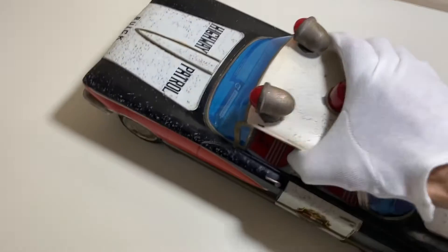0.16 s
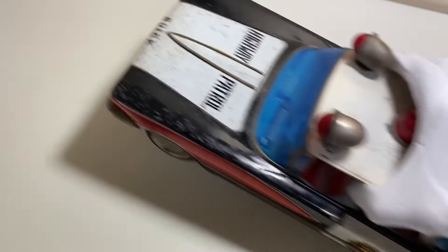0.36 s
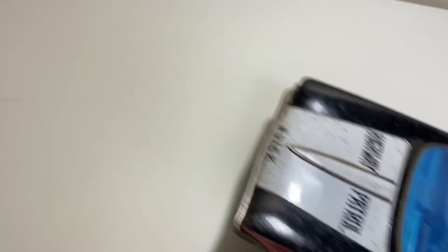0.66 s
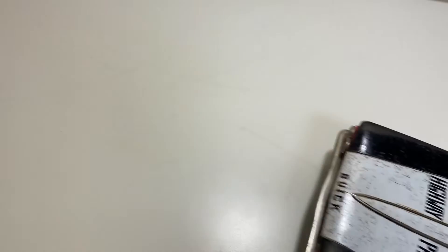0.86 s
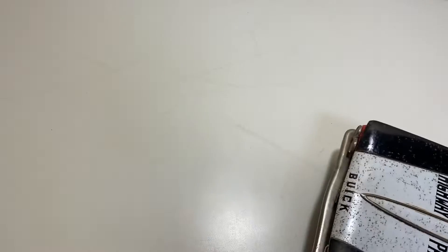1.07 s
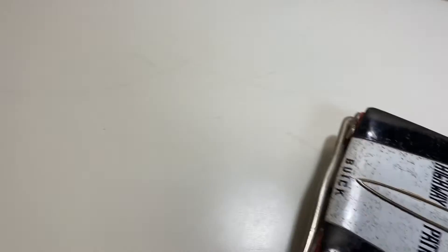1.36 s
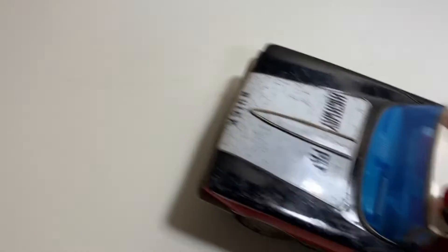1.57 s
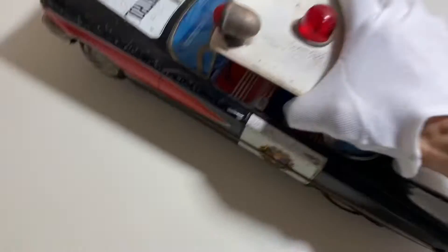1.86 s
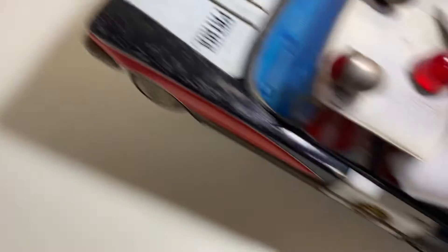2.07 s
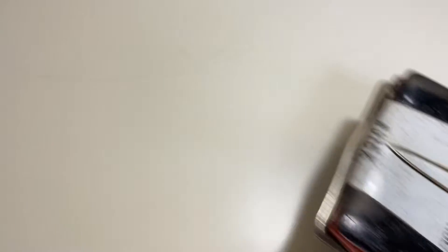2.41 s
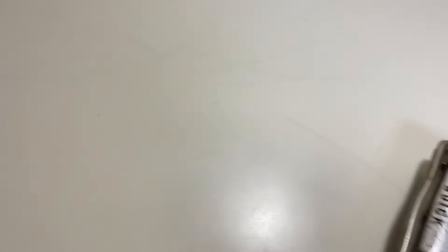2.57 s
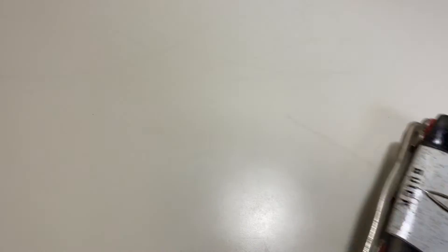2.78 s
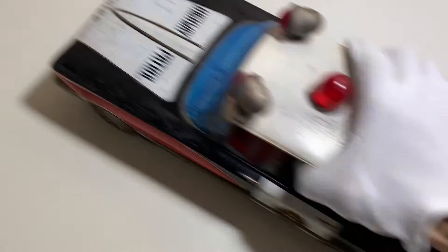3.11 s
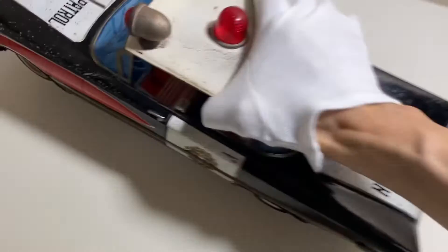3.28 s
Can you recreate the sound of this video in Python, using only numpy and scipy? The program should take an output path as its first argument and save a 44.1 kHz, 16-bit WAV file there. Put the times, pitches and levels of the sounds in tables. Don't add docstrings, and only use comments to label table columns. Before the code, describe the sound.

A tin toy car whirrs very faintly at first, then hits a table with hard, ringing clacks at 0.8 s. Its roll slows with small knocks until 1.4 s. A push from 1.5 s brings gritty rumble and rising gear rattle; lifted at 1.9 s, it whirrs freely. It smacks down at 2.57 s, rolls with knocks until 3.2 s, then whirrs brightly to the end. Close, small room.

```python
import sys
import numpy as np
from scipy import signal
from scipy.fft import rfft, irfft, next_fast_len
from scipy.io import wavfile
from scipy.ndimage import uniform_filter1d, map_coordinates

SR = 44100
rng = np.random.default_rng(int(sys.argv[2]) if len(sys.argv) > 2 else 0)


def boost(x):
    u = np.asarray(x, float) / 20
    return 10 ** u


def store_pcm(level_fs):
    pcm = np.round(np.clip(level_fs, -1, 1) * 32767).astype(np.int16)
    wavfile.write(sys.argv[1], SR, np.atleast_2d(pcm).T)


N = 152145
TOP_HZ = 15750
TONE_SWELL_DB = 1.8

# centre_hz, width_hz, level_db
SHELL = [(401.5, 33, 1), (498.6, 12.7, 3.5), (643, 101, -1.5), (816, 31, -2.5), (888, 68, -6),
         (1055, 55, -5), (1450, 190, -13.5), (1605, 30, -5.5), (1963, 30, -37)]
# centre_hz, width_hz, level_db
PANELS = [(2520, 40, 6), (3157, 16, -3.5), (4280, 380, -2), (4920, 15, 6.5), (5480, 8.5, 9), (6046, 41, 1),
          (6950, 180, -0.5), (7500, 22, 9), (8150, 440, 3.5), (10560, 710, -13), (15130, 1100, 5)]
# centre_hz, width_hz, level_db
TABLE = [(56, 5.3, 3), (105, 12, 0.5), (162, 54, -6), (224.3, 13.7, -0.5), (299.4, 31, 1),
         (418.4, 45.4, 4.5), (503.3, 41, 5.5), (638, 112, 6.5), (798, 152, 0.5), (1073, 117, 1),
         (1254, 51, 1), (1519, 129, 2)]
# freq_hz, density_db
FIZZ = [(300, -24.5), (1500, 5), (2500, 0), (4000, 0.5), (8000, 1.5), (12000, 2.5), (15600, -4.5),
        (16000, -56)]
# freq_hz, density_db
GRIT = [(40, -52), (300, -9), (800, -6), (1800, -10.5), (3000, -20), (6000, -36), (16000, -77)]


def unit(x):
    return x / np.sqrt(np.mean(x ** 2) + 1e-20)


def along(points, hz):
    f, v = np.transpose(points)
    return np.interp(np.log(hz + 1), np.log(f + 1), v)


def curves(rows):
    s, *cols = np.transpose(rows)
    return [np.interp(np.arange(N) / SR, s, c) for c in cols]


def wobble(rate):
    return map_coordinates(rng.standard_normal(N // 100), [np.arange(N) * rate / SR])


def filtered(x, response):
    m = next_fast_len(x.shape[-1] + SR // 2)
    spectrum = rfft(x, m) * response(np.fft.rfftfreq(m, 1 / SR))
    return irfft(spectrum, m)[..., :x.shape[-1]]


def below_top(f):
    return f < TOP_HZ


def colour(points):
    return lambda f: boost(along(points, f))


def body(peaks, low=0, high=1e9):
    def response(f):
        total = 0
        for k, (centre, width, db) in enumerate(peaks):
            if low <= centre < high:
                damping = 1j * f * width
                total = total + (-1) ** k * boost(db) * damping / (centre * centre - f * f + damping)
        return total
    return response


def blows(where, scatter_db):
    size_db = scatter_db * np.minimum(rng.exponential(1, N), 2.6)
    return unit(where * boost(size_db) * rng.standard_normal(N))


def handled(x, peaks):
    return sum(boost(2.5 * wobble(5.5)) * filtered(x, body([peak])) for peak in peaks)


def patchy(x):
    z = signal.stft(x, nperseg=512)[2]
    field = uniform_filter1d(rng.standard_normal(z.shape), size=5, axis=0)
    field = uniform_filter1d(field, size=16, axis=1)
    return signal.istft(z * boost(1.9 * unit(field)), nperseg=512)[1][:N]


def gears():
    # time_s, whirr_db, shell_share_db
    spin = [(0, -46.5, -16), (.2, -45, 2.5), (.45, -51.5, 4.5), (.78, -48, 13.5), (1.01, -62, 15),
            (1.14, -63, 14), (1.34, -65, 1), (1.5, -46.5, 4), (1.68, -33, 4), (1.92, -29, -5),
            (2.25, -35.5, -1), (2.55, -37, 5), (2.75, -35.5, -0.5), (3.1, -31.5, 11), (3.3, -27.5, -4),
            (3.45, -28.5, -11)]
    # time_s, rate_hz, tone_db
    mesh = [(0, 700, -73), (.25, 707, -65), (.75, 690, -51), (.85, 560, -73), (1.3, 309, -48),
            (1.82, 710, -38), (1.93, 680, -44), (2.55, 652, -46.5), (2.62, 600, -75), (3.2, 670, -37),
            (3.3, 665, -47), (3.45, 710, -44)]
    whirr_db, shell_db = curves(spin)
    rate, tone_db = curves(mesh)
    turn = np.cumsum(rate * (1 + .007 * wobble(30))) / SR
    jitter = .25 * wobble(400)
    teeth = np.diff(np.floor(turn + jitter), prepend=0) != 0
    scrape = rng.standard_normal(N) * (1 + 0.19 * np.cos(np.pi * turn))
    strikes = 0.5 * blows(teeth, 4.5) + 1.16 * scrape

    clicks = patchy(1.2 * strikes + handled(strikes, PANELS))
    fizz = unit(filtered(clicks, lambda f: colour(FIZZ)(f) * below_top(f)))
    buzz = unit(filtered(handled(strikes, SHELL), lambda f: 1 / (1 + (320 / (f + 1)) ** 7.5)))
    tone = boost(TONE_SWELL_DB * wobble(24.3)) * np.sin(2 * np.pi * turn)
    octave = boost(6.0 + TONE_SWELL_DB * wobble(23.35)) * np.sin(4 * np.pi * turn)

    eccentric_db = .5 * wobble(7.7) + 0.22 * wobble(34.06)
    rattle = boost(4.0) * fizz + boost(shell_db + 3.2 * wobble(17)) * buzz
    whirr = boost(whirr_db + eccentric_db) * rattle
    return whirr + boost(tone_db) * (tone + octave) + filtered(singing(strikes), below_top)


def wheels():
    # time_s, rolling_db
    push = [(0, -33.5), (.12, -40), (.24, -43.5), (.3, -75), (.78, -72), (.83, -29), (1.05, -38),
            (1.14, -49.5), (1.34, -40), (1.5, -28.5), (1.65, -24), (1.84, -24.5), (1.9, -58), (2.55, -58),
            (2.6, -26), (2.79, -33), (2.92, -24.5), (3.11, -20.5), (3.2, -25), (3.25, -45)]
    roll_db, = curves(push)
    bumps_per_s = 1400
    grit = blows(rng.random(N) < bumps_per_s / SR, 2.2) + 0.94 * rng.standard_normal(N)
    upper = unit(filtered(grit, lambda f: (body(TABLE, 260)(f) + 0.97 * colour(GRIT)(f)) * below_top(f)))
    thud = unit(filtered(grit, body(TABLE, 0, 140)))
    rumble = unit(filtered(grit, body(TABLE, 140, 260)))
    fall_db = 110 * np.arange(N) / SR
    sway_db = np.maximum.accumulate(roll_db + fall_db) - fall_db
    rolling = boost(roll_db + 0.86 * wobble(45)) * (upper + boost(-10.5) * rumble)
    return rolling + boost(sway_db + 1.8 * wobble(17) - 10.5) * thud


def room_floor():
    # freq_hz, density_db
    hum = [(25, -7.5), (60, -0.5), (250, -4.5), (600, 1), (1500, 3), (4000, -21), (15600, -75),
           (16000, -60)]
    noise = rng.standard_normal(N)
    return boost(-50) * unit(filtered(noise, lambda f: colour(hum)(f) * below_top(f)))


def singing(strikes):
    # start_s, end_s, pitch_hz, end_pitch_hz, level_db
    free = [(.01, 0.718, 1442, 1395, -47), (.01, 0.658, 4640, 4330, -52.5), (0.217, 0.747, 6980, 6750, -53),
            (0.096, 0.313, 6320, 5900, -53), (1.816, 2.117, 4280, 4160, -44),
            (1.95, 2.297, 5600, 5530, -41), (2.33, 2.565, 655, 635, -33), (2.903, 3.183, 7500, 7500, -38),
            (3.239, 3.504, 1057, 1046, -35.5), (3.246, 3.5, 5740, 5720, -37.5),
            (2.1, 2.171, 667, 660, -37.5), (2.188, 2.246, 670, 665, -35.5), (1.937, 2.037, 1370, 1335, -44),
            (1.84, 1.947, 1003, 996, -37.5), (1.441, 1.476, 697, 680, -31), (1.506, 1.538, 690, 660, -30),
            (1.566, 1.609, 444, 432, -25.5), (1.58, 1.629, 855, 892, -28.5),
            (1.612, 1.665, 1686, 1720, -31), (1.636, 1.66, 2520, 2450, -31), (1.64, 1.722, 500, 467, -28),
            (1.738, 1.81, 500, 506, -31), (1.796, 1.834, 853, 883, -30), (1.806, 1.878, 1458, 1380, -25),
            (2.651, 2.706, 349, 397, -29), (2.804, 2.88, 672, 718, -30.5), (2.927, 3.007, 422, 396, -29.5),
            (3.019, 3.081, 1650, 1700, -25.5), (3.026, 3.086, 790, 790, -31), (3.036, 3.149, 424, 440, -30),
            (3.11, 3.137, 624, 610, -29), (3.121, 3.205, 1535, 1590, -31.5)]
    width_hz = 75
    out = np.zeros(N)
    for a, b, hz, end_hz, db in free:
        start = round(a * SR)
        piece = strikes[start:round(b * SR)]
        u = np.arange(len(piece)) / SR / (b - a)
        narrow = filtered(piece, lambda f: body([(hz, width_hz, 0)])(f) ** 2)
        band = signal.hilbert(unit(narrow))
        drift = np.exp(1j * np.pi * (end_hz - hz) * (b - a) * u ** 2)
        swell = np.sqrt(np.abs(np.sin(np.pi * u)))
        out[start:][:len(piece)] += boost(db) * swell * np.real(band * drift)
    return out * boost(TONE_SWELL_DB * wobble(26))


def knocks():
    # time_s, peak_db, thud_db, clank_db, length_factor
    contacts = [(0.162, -16.5, -23, -28, 1.09), (0.618, -37, -25, -25, 0.66), (0.795, -9, -11, -42, 0.4),
                (0.801, -9.5, -13, -21.5, 0.71), (0.815, -14, -4, -31, 0.84), (0.83, -25, -18, -13.5, 0.79),
                (0.903, -15.5, -13, -33.5, 0.88), (0.987, -23.5, -14, -29, 0.42),
                (1.024, -28, -15, -42, 1.1), (1.157, -19, -15, -42, 1.12), (1.2, -38, -2, -42, 1),
                (1.219, -31, -25, -12.5, 0.38), (1.225, -17.5, -16, -37, 0.93),
                (1.261, -15, -13.5, -23.5, 1), (1.4, -49, -20, -30, 0.48), (1.432, -23, -5, -38, 0.94),
                (1.514, -26, -17, -30, 0.55), (1.629, -16.5, -20, -37, 0.74), (1.666, -13, -20, -32, 0.7),
                (1.749, -8, -24, -23.5, 0.78), (2.12, -19.5, -33, -19, 0.5), (2.209, -25, -25, -15, 0.71),
                (2.28, -34, -22, -6, 0.85), (2.395, -29, -24, -20, 1), (2.567, -5, -7.5, -19, 0.76),
                (2.66, -22, -9, -24, 0.84), (2.809, -13, -16, -20.5, 0.63), (2.869, -20.5, -18, -32, 1.2),
                (3.031, -19, -23, -38, 0.84), (3.119, -8.5, -18, -19, 0.54), (3.304, -26, -39, -2, 0.68)]
    # freq_hz, t60_s
    decay = [(100, 0.034), (400, 0.24), (1200, 0.12), (3000, 0.2), (8000, 0.1), (15000, 0.099)]
    # centre_hz, width_hz, level_db
    thump = [(104.6, 10.6, 5), (172, 81, -4), (261.6, 40, 3)]
    clack_rise_s, clank_rise_s, shove_s = 0.0018, 0.0033, 0.0014
    touch_s = .002
    out, size = np.zeros((3, N + SR)), SR // 4
    t = np.arange(size) / SR
    for s, db, thud_db, clank_db, longer in contacts:
        hz, tt, z = signal.stft(rng.standard_normal(size), SR, nperseg=128)
        t60 = longer * along(decay, hz)
        tail = signal.istft(z * boost(-60 * tt / t60[:, None]), SR, nperseg=128)[1][:size]
        snap = tail * (1 - np.exp(-t / clack_rise_s))
        tick = tail * (1 - np.exp(-t / clank_rise_s)) * (1 + 0.37 * boost(-60 * t / 0.0054))
        shove = 0.44 * tail + (1 - t / shove_s) * np.exp(-t / shove_s)
        levels = boost(db + np.array([[thud_db], [0], [clank_db]]))
        out[:, round((s - touch_s) * SR):][:, :size] += levels * np.array([shove, snap, tick])

    def clack_path(f):
        return body(TABLE, 260)(f) + .5 * body(SHELL)(f) + 0.69 * colour(GRIT)(f)

    thud = boost(15.5) * filtered(out[0], body(thump))
    clack = boost(6.5) * filtered(out[1], clack_path)
    clank = boost(3) * filtered(out[2], lambda f: colour(FIZZ)(f) * (2.58 + body(PANELS)(f)))
    return (thud + clack + clank)[:N]


def rings():
    # start_s, pitch_hz, settled_pitch_hz, level_db, t60_s
    plates = [(.795, 171, 490, -13.5, .24), (.82, 1025, 1086, -15.5, .12), (.903, 645, 634, -13, 0.046),
              (1.156, 660, 614, -23, .04), (1.222, 2482, 2470, -30, 0.082), (1.224, 1610, 1620, -35, 0.061),
              (1.262, 710, 674, -22, .08), (1.259, 15200, 14650, -34, .05), (1.433, 665, 665, -18, .05),
              (2.569, 544, 567, -16.5, 0.17), (2.569, 1510, 1460, -15, .06), (2.572, 794, 790, -28, .15),
              (2.809, 680, 670, -20, .05), (2.568, 2540, 2560, -20, 0.08)]
    settle_s, rise_s = 0.0192, 0.0034
    out, t = np.zeros(N + SR), np.arange(SR // 4) / SR
    for s, hz, end_hz, db, t60 in plates:
        turn = end_hz * t + (hz - end_hz) * settle_s * (1 - np.exp(-t / settle_s))
        envelope = boost(db - 60 * t / t60) * (1 - np.exp(-t / rise_s))
        out[round(s * SR):][:len(t)] += envelope * np.sin(2 * np.pi * turn)
    return out[:N]


def scattered(x):
    z = signal.stft(x, nperseg=1024)[2]
    field = rng.standard_normal((2,) + z.shape)
    field = uniform_filter1d(uniform_filter1d(field, size=4, axis=1), size=9, axis=2)
    other = signal.istft(z * np.exp(1j * np.arctan2(*field)), nperseg=1024)[1][:N]
    return unit(other) * np.std(x)


def ports(x):
    # freq_hz, coherence (0 to 1)
    alike = [(60, 1), (400, 0.74), (900, 0.7), (1500, 0.051), (2500, 0.54), (5000, 0.45), (6200, 0.84),
             (16000, 0.96)]
    # freq_hz, level_db
    lean = [(100, 1.5), (400, -2), (1400, 3), (3000, 2), (7000, 0)]
    in_step_hz, turn_hz = 6934, 4110
    sides = np.array([[1], [-1]])

    def response(f, part):
        u = 2 * np.pi * (np.maximum(f, in_step_hz) - in_step_hz) / turn_hz
        lag = u - .75 * np.sin(2 * u) / 2
        mix = np.arccos(np.clip(along(alike, f), -1, 1)) / 2
        return part(mix) * boost(sides * along(lean, f) / 2) * np.exp(-.5j * sides * lag)

    direct = filtered(x, lambda f: response(f, np.cos))
    reflected = filtered(scattered(x), lambda f: response(f, np.sin))
    return direct + sides * reflected


def scene():
    return ports(gears() + wheels() + room_floor() + knocks() + rings())


def low_pass(x):
    return signal.sosfilt(signal.butter(12, 17080, fs=SR, output="sos"), x)


def record(dry):
    mix = filtered(dry, lambda f: np.where(below_top(f), 1, boost(-30)))
    return low_pass(mix)


dry = scene()
out = record(dry)
store_pcm(out)
```